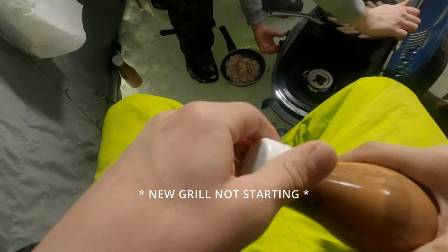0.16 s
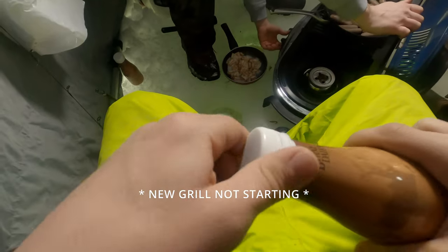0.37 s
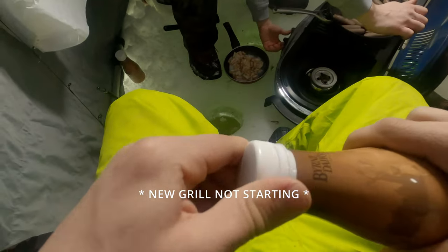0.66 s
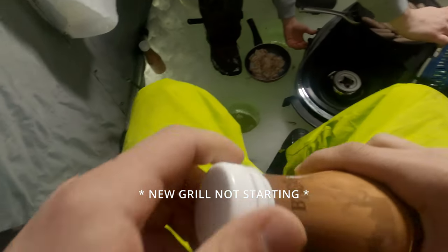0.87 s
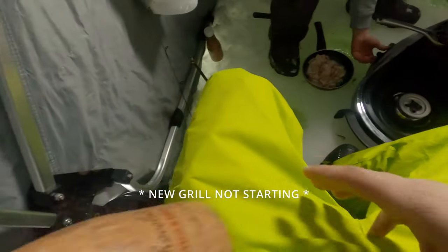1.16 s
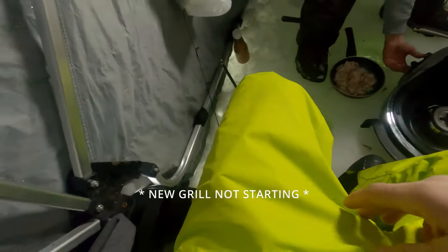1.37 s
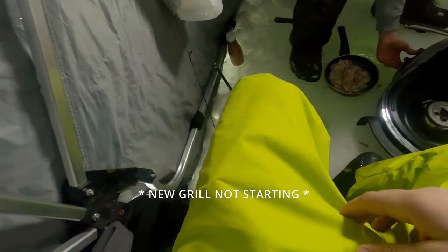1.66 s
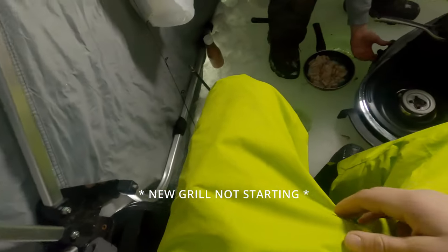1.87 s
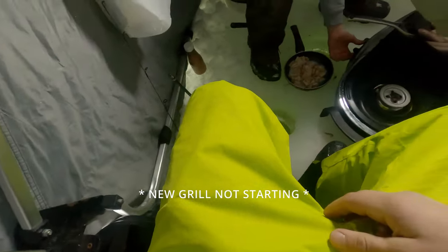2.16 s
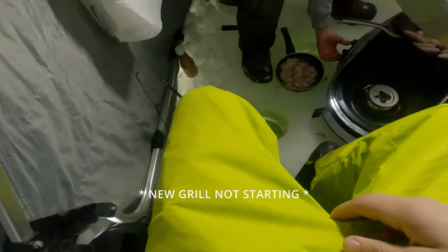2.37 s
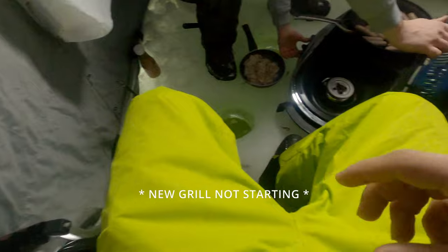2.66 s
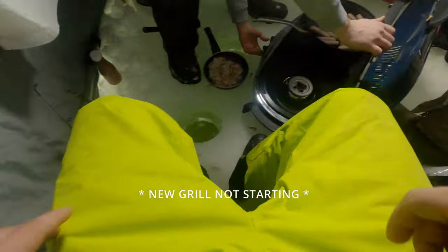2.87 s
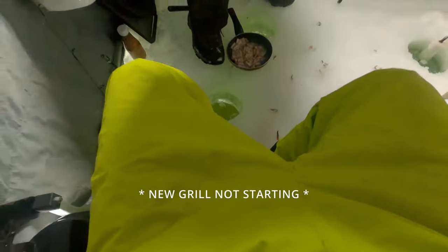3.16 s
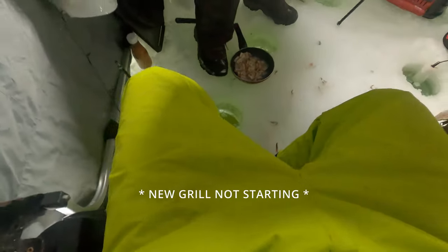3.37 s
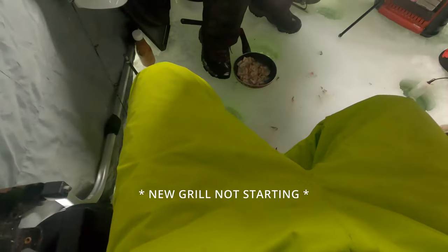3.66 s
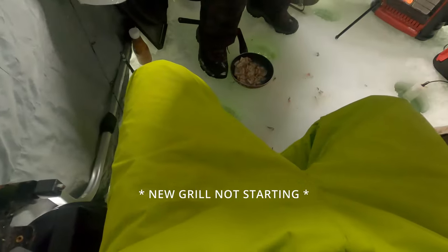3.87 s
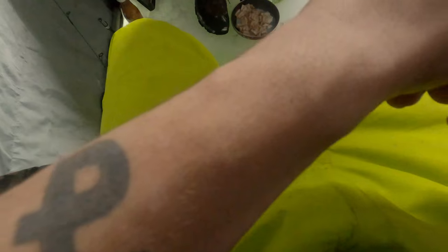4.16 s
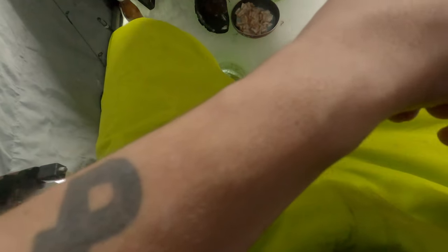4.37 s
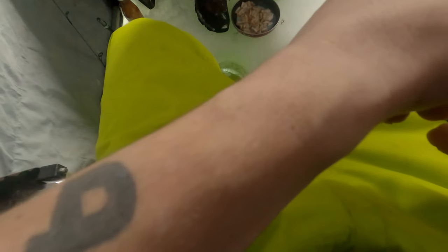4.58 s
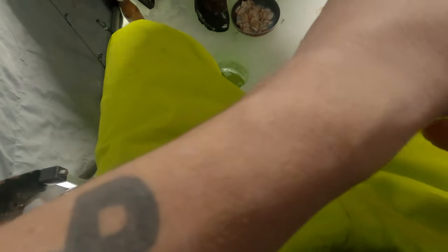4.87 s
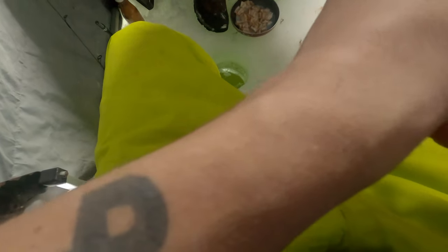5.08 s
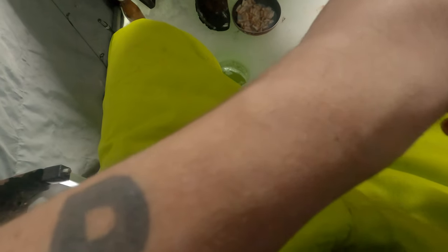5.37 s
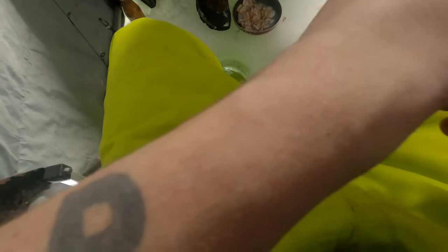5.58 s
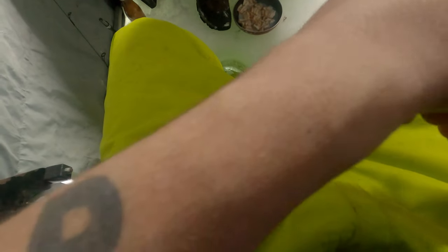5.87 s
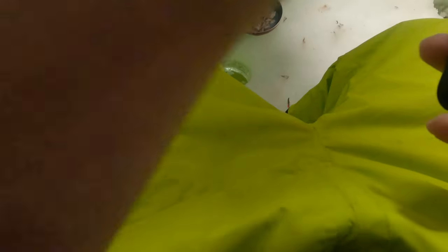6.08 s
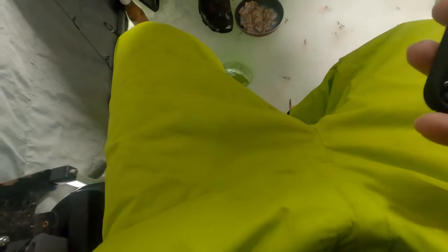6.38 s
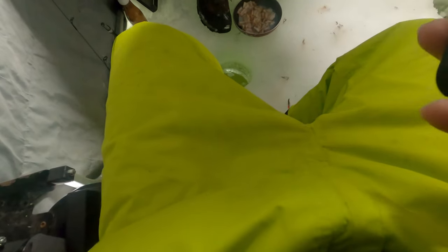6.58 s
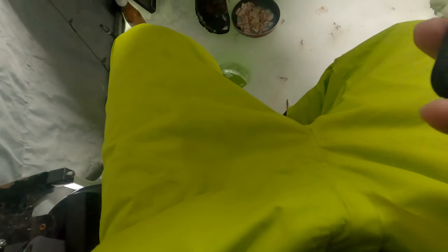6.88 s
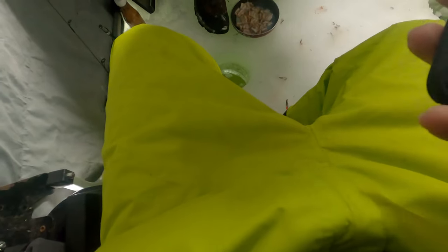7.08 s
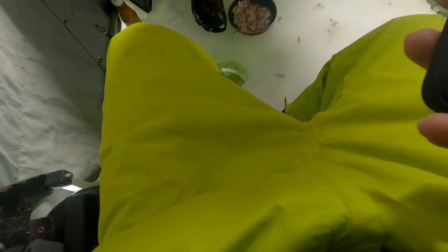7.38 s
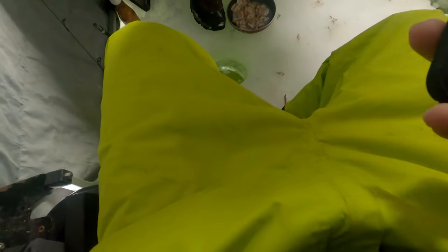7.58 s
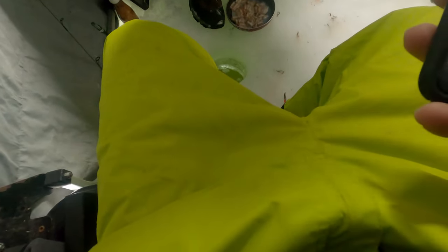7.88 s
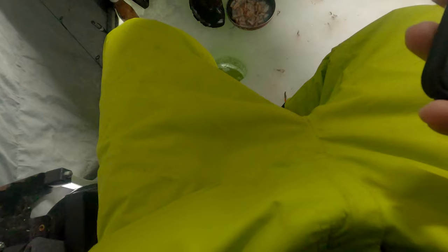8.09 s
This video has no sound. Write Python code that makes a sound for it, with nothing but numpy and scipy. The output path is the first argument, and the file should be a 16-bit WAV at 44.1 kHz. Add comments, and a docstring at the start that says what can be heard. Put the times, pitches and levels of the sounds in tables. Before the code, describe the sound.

Sharp, slightly ringing igniter snaps repeat on a grill that never catches, with soft rattles, thuds and close bottle handling.

```python
"""Gas grill that will not light

A portable grill's piezo igniter is pressed again and again in a small shack; the gas never catches.
Each hammer snap rings the metal, and the button rattles softly between presses. The grill is bumped a few
times. Close by, someone handles a bottle and shifts in stiff trousers, over faint gas hiss and rumble."""
import sys
import numpy as np
from scipy import signal
from scipy.fft import rfft, irfft
from scipy.io import wavfile
from scipy.ndimage import uniform_filter1d

SR = 44100
rng = np.random.default_rng(int(sys.argv[2]) if len(sys.argv) > 2 else 0)


def wav_out(sig):
    """Save sig, one row per channel (or a flat mono array), as 16-bit PCM at SR to the path in sys.argv[1]."""
    wavfile.write(sys.argv[1], SR, np.round(np.clip(np.atleast_2d(sig).T, -1, 1) * 32767).astype(np.int16))


N = 363516
HIT = 2 ** 15  # samples per hit
HIT_TIME_S, TIME_S = np.arange(HIT) / SR, np.arange(N) / SR
SIDES = np.array([[1], [-1]])  # left, right


def undb(db):
    """Decibels to gain."""
    return 10 ** (np.asarray(db) / 20)


def decay(t60_s, time_s=HIT_TIME_S):
    """Envelope falling 60 dB in t60_s."""
    return np.exp(-np.log(1000) * time_s / t60_s)


def contour(points, size=HIT):
    """(freq_hz, value) points joined over log frequency, per FFT bin."""
    hz, value = np.transpose(points)
    return np.interp(np.log(np.fft.rfftfreq(size, 1 / SR) + 1), np.log(hz), value)


def humps(resonances, size=HIT):
    """(centre_hz, half_width_hz, gain_db) rows as bell curves, dB per FFT bin."""
    bin_hz = np.fft.rfftfreq(size, 1 / SR)
    return sum(db * np.exp(-((bin_hz - hz) / width) ** 2) for hz, width, db in resonances)


def causal(gain_db):
    """Minimum-phase response: rings only after it is struck."""
    cepstrum = irfft(np.log(undb(gain_db)))
    cepstrum[1:HIT // 2] *= 2
    cepstrum[HIT // 2 + 1:] = 0
    return np.exp(rfft(cepstrum))


def flatten(spectrum, width_hz):
    """Remove broad colour, keep fine peaks and dips."""
    power = np.mean(np.abs(np.atleast_2d(spectrum)) ** 2, axis=0)
    broad_power = uniform_filter1d(power, int(width_hz * HIT / SR))
    return spectrum * causal(-10 * np.log10(broad_power + 1e-12))


def stereo_noise(size, spread):
    """White noise, its channels most alike in the bass."""
    mid, side = rfft(rng.standard_normal((2, size)))
    share = spread * contour([(300, 0.13), (1200, 0.47), (4000, 1)], size)
    return irfft((mid + SIDES * share * side) / np.sqrt(1 + share ** 2))


def coloured_noise(colour_db, spread):
    """Scene-long stereo noise, rms 1."""
    noise = irfft(rfft(stereo_noise(N, spread)) * undb(colour_db))
    return noise / noise.std()


def flicker(rate_hz, depth_db):
    """Randomly wandering gain."""
    steps = TIME_S * rate_hz
    knots = rng.standard_normal(int(steps[-1]) + 2)
    return undb(depth_db * np.interp(steps, np.arange(len(knots)), knots))


def swell(middle_s, length_s, attack_s, release_s):
    """Envelope of one movement: rise, hold, decay."""
    t = TIME_S - middle_s
    return np.exp(np.minimum(t + length_s / 2, 0) / attack_s - np.maximum(t - length_s / 2, 0) / release_s)


def rub(length_s):
    """Spectrum of many small slips that swell and fade."""
    progress = HIT_TIME_S / length_s
    return rfft(rng.standard_normal(HIT) * progress * np.exp(-2 * progress ** 2))


def add_hit(out, spectrum, start_s, level_db, pan_db=0):
    """Mix in a hit; level_db is its energy spread over 20 ms, pan_db is left minus right."""
    hit, start = irfft(spectrum), int(start_s * SR)
    hit /= np.sqrt(np.sum(hit ** 2) / (2 * 0.02 * SR))
    pan = undb(SIDES * pan_db / 2)
    pan /= np.sqrt(np.mean(pan ** 2))
    out[:, start:start + HIT] += (hit * undb(level_db) * pan)[:, :N - start]


# freq_hz, t60_s
SHACK_DECAY = [(150, 0.22), (400, 0.33), (700, 0.43), (1150, 0.15), (1700, 0.19), (2500, 0.2), (4000, 0.15),
               (6500, 0.13), (12000, 0.11)]


def shack_tail(noise):
    """Reverberation spectrum: noise dying away band by band."""
    hz, t60_s = np.transpose(SHACK_DECAY)
    spectrum, tail = rfft(noise), 0
    for weights, band_t60_s in zip(np.eye(len(hz)), t60_s):
        band = irfft(spectrum * contour(np.c_[hz, weights]))
        envelope = decay(band_t60_s)
        tail += band * envelope / np.linalg.norm(envelope)
    return rfft(tail)


def shack_path(room_noise, moved=0.97, early_db=-5, early_s=0.0073, onset_s=0.0057):
    """Early reflections off floor and shell, then a tail that changes as people move."""
    t = HIT_TIME_S
    early = stereo_noise(HIT, spread=0.55) * t / early_s * np.exp(-2 * (t / early_s) ** 2)
    early = rfft(early / np.linalg.norm(early[0]))
    echoes = (room_noise + moved * stereo_noise(HIT, spread=1)) / np.hypot(1, moved)
    return undb(early_db) * early + shack_tail(echoes * (1 - np.exp(-t / onset_s)))


# freq_hz, gain_db
SHELL_COLOUR = [(100, -20), (220, -1), (450, -8), (800, -13), (1000, -4), (1400, 1.2), (2700, 0.5),
                (4800, -0.3), (6800, -3), (7500, -6.5), (9500, -14.5), (15000, -28)]
# centre_hz, half_width_hz, leaning_forward_db, sitting_back_db, db_per_hardness_db
SHELL_RESONANCES = [(219, 42, 1, -5, -0.26), (363, 63, -14, 4, 0.36), (630, 310, 6.3, -2.5, -0.44),
                    (1125, 110, 2, 4.5, -0.33), (1525, 167, -7, -5.5, 0), (2270, 560, 1, -1.5, 0.41),
                    (3172, 160, 3, 5, 0.21), (3820, 190, 1.5, 2.5, -0.12), (5720, 450, 5.5, 2, 0.2),
                    (6250, 110, -2, 2.5, 0.65), (6575, 213, 4, 8.5, 1)]


def shell_db(start_s, hardness_db=0, depth=1, scatter_db=0, sit_back_s=3.2):
    """Igniter and shell spectrum; peaks depend on listening position and hardness of the blow."""
    hz, width_hz, forward_db, back_db, slope = np.transpose(SHELL_RESONANCES)
    peaks_db = (forward_db if start_s < sit_back_s else back_db) + hardness_db * slope
    if scatter_db:
        peaks_db += scatter_db * rng.standard_normal(len(hz))
    return contour(SHELL_COLOUR) + humps(np.c_[hz, width_hz, depth * peaks_db])


# time_s, pan_db
GRILL_PAN = [(0, -1.5), (2.2, -1), (6.5, 1), (7.2, 3.5)]


def grill_pan_db(start_s):
    """Direction of the grill as the listener turns."""
    return np.interp(start_s, *np.transpose(GRILL_PAN))


# pitch_hz, relative_db, t60_s
GRATE_MODES = [(211, -13, 0.49), (373.7, 8.5, 0.41), (1068, -2, 0.42), (1263, -3, 0.45), (1400, 0, 0.33),
               (1600, -0.5, 0.39), (1663, 17.5, 0.11), (2340, 0, 0.54), (2920, 9, 0.3), (3077, -8.5, 0.95),
               (3170, 14.5, 0.12), (3500, 0, 0.3), (4000, -1.5, 0.36), (4260, 2, 0.33), (4770, -8, 0.4),
               (5260, 8.5, 0.24), (6240, -2, 0.17), (6630, -14, 0.48)]


def grate_ring(gain_db=-18, scatter_db=2):
    """Lightly damped modes of grate and bowl, varying with each blow."""
    hz, db, t60_s = np.transpose(GRATE_MODES)[:, :, None]
    gains = undb(db + scatter_db * rng.standard_normal(db.shape))
    phases = rng.uniform(0, 2 * np.pi, db.shape)
    ring = np.sum(gains * np.sin(2 * np.pi * hz * HIT_TIME_S + phases) * decay(t60_s), axis=0)
    return undb(gain_db) * rfft(ring / np.linalg.norm(ring))


# start_s, level_db, hardness_db, ring_hz, ring_db, clack_hz
HAMMER_SNAPS = [(0.003, -19, -8.5, 1170, 4.5, 3470), (0.5157, -18.5, -6.5, 1180, 7, 3460),
                (0.9424, -17.5, 4.5, 1130, 12.5, 3190), (1.3777, -18, 2.5, 1123, 11.5, 3190),
                (1.7906, -18, -0.5, 1151, 17, 2830), (2.2267, -19, 3, 1290, 4, 3190),
                (2.7505, -18, -1.5, 1150, 14, 3130), (3.2285, -18, 1.5, 1160, 8, 3400),
                (3.751, -18, -8.5, 1180, 5, 3300), (5.486, -18, -2.5, 1547, 16.5, 3810),
                (6.013, -19.5, -1.5, 1120, 8.5, 3790), (6.5158, -19, -1, 1200, 5.5, 3360),
                (6.867, -20, 2, 1680, -3, 3290), (7.202, -19.5, 3.5, 1670, 3, 3850),
                (7.533, -20, 5, 1630, 0, 3810), (7.889, -19.5, 4, 1610, 0.5, 3280),
                (8.23, -19, 4.5, 1670, 5, 3140)]


def hammer_snaps(room_noise, ring_width_hz=152, clack_width_hz=170, clack_db=6.5):
    """The hammer lands and chatters; the bowl rings and the casing clacks."""
    out = np.zeros((2, N))
    for start_s, level_db, hardness_db, ring_hz, ring_db, clack_hz in HAMMER_SNAPS:
        chatter = rub(length_s=0.002)
        blow = 1 + undb(-7) * chatter / np.std(chatter)
        peaks_db = humps([(ring_hz, ring_width_hz, ring_db), (clack_hz, clack_width_hz, clack_db)])
        body = causal(shell_db(start_s, hardness_db, scatter_db=0.78) + peaks_db)
        strike = flatten(blow * shack_path(room_noise), width_hz=455)
        add_hit(out, body * (strike + grate_ring()), start_s, level_db, grill_pan_db(start_s))
    return out


# freq_hz, gain_db
FABRIC_COLOUR = [(60, 9.5), (150, 2.5), (350, 0.5), (750, -5.5), (1200, 1), (2000, -4), (4000, -4.5),
                 (6500, -14.5), (10000, -22), (15000, -35)]
# middle_s, length_s, level_db
LEG_MOVES = [(0.156, 0.57, -51.5), (1.045, .12, -48.5), (1.297, 0.13, -43), (1.792, 1.42, -52),
             (1.999, 0.066, -43), (2.69, 0.23, -50), (3.404, 1.04, -57.5), (4.904, 0.075, -56),
             (6.193, 0.54, -59.5)]


def trouser_rustle(attack_s=0.085, release_s=0.1):
    """Stiff fabric catches and slips with each movement."""
    power = sum((undb(level_db) * swell(middle_s, length_s, attack_s, release_s)) ** 2
                for middle_s, length_s, level_db in LEG_MOVES)
    rustle = coloured_noise(contour(FABRIC_COLOUR, N), spread=1) * np.sqrt(power)
    return rustle * flicker(rate_hz=54, depth_db=3) * flicker(rate_hz=500, depth_db=2.5)


# time_s, level_db
GAS_LEVEL = [(0, -58.5), (4.08, -56.5), (4.17, -62), (4.38, -60), (4.5, -55), (5.12, -52), (5.26, -57),
             (6.4, -57), (7.1, -53), (8.24, -54)]
# freq_hz, gain_db
GAS_COLOUR = [(100, 10), (270, 1.5), (450, 2.5), (650, -1.5), (880, -8.5), (1350, 4), (2400, -2.5),
              (4000, 1), (6000, -5.5), (7200, -9.5), (8800, -12.5), (10000, -21), (15000, -31)]
# centre_hz, half_width_hz, gain_db
BURNER_RESONANCES = [(363.6, 24, 16.1), (510, 51, 11.2), (1702, 6.8, 13), (1923, 17, 13), (3110, 13, 6),
                     (3800, 16, 5.4), (4160, 26, 6.9), (4890, 32, 7.5), (5160, 25, 7.9), (8240, 45, 4.5),
                     (7900, 70, 4)]


def gas_hiss(cavity_t60_s=0.5):
    """Gas hisses in the hollow burner, whose narrow modes crowd towards the treble."""
    cavity = rng.standard_normal(N) * decay(cavity_t60_s, TIME_S)
    ripple_db = 20 * np.log10(np.abs(rfft(cavity / np.linalg.norm(cavity))) + 0.66)
    ripple_db *= contour([(400, 0.11), (2000, 1)], N)
    colour_db = contour(GAS_COLOUR, N) + humps(BURNER_RESONANCES, N) + ripple_db
    gain = undb(np.interp(TIME_S, *np.transpose(GAS_LEVEL)))
    return coloured_noise(colour_db, spread=0.93) * gain * flicker(rate_hz=11, depth_db=1)


# freq_hz, gain_db
LOW_RUMBLE_COLOUR = [(10, -7), (25, -2.5), (45, 0.5), (70, 2), (100, -3.5), (150, -11.5), (250, -21),
                     (600, -34), (2000, -71)]
# middle_s, length_s, level_db, pan_db
MIC_JOLTS = [(0.398, 0.13, -48, -2), (2.047, 0.12, -45.5, 2), (3.087, 0.12, -42, 7), (3.8, 0.22, -50, -1),
             (5.07, 0.17, -46.5, 1.5)]


def rumble(floor_db=-50, attack_s=0.033, release_s=0.078):
    """Low rumble that swells when the body-worn microphone is jolted."""
    power = undb(floor_db) ** 2
    for middle_s, length_s, level_db, pan_db in MIC_JOLTS:
        jolt = undb(level_db + SIDES * pan_db / 2) * swell(middle_s, length_s, attack_s, release_s)
        power = power + jolt ** 2
    noise = coloured_noise(contour(LOW_RUMBLE_COLOUR, N), spread=1.63)
    return noise * np.sqrt(power) * flicker(rate_hz=9.8, depth_db=3.5)


# start_s, level_db, length_s
FINGER_SCRAPES = [(0.161, -37, 0.037), (0.207, -39, 0.029), (1.044, -47.5, 0.042), (1.14, -45, 0.043),
                  (1.204, -36, 0.054), (1.261, -45, 0.043), (1.313, -43.5, 0.028), (2, -52, 0.024),
                  (2.571, -44.5, 0.12), (4.814, -46.5, 0.077), (5.035, -49, 0.052), (5.113, -52.5, 0.017)]
# freq_hz, gain_db
FINGER_COLOUR = [(100, -11.5), (400, 4.5), (800, -5), (1200, -1), (2000, -0.5), (3000, 2.5), (5000, -2),
                 (6500, -10.5), (10000, -20), (15000, -34)]


def finger_scrapes(echo_db=3):
    """Fingers slip unevenly over bottle cap and trousers."""
    out, colour = np.zeros((2, N)), causal(contour(FINGER_COLOUR))
    for start_s, level_db, length_s in FINGER_SCRAPES:
        scrape = colour * rub(length_s)
        room = 1 + undb(echo_db) * shack_tail(stereo_noise(HIT, spread=0.98))
        add_hit(out, scrape * room, start_s, level_db)
    return out


# start_s, level_db
BUTTON_RATTLES = [(.274, -46.5), (0.421, -41.5), (0.752, -48), (0.875, -41), (2.483, -48), (2.994, -46.5),
                  (3.356, -41), (3.475, -42), (3.936, -48.5), (4.002, -43.5), (4.083, -47.5),
                  (4.497, -43.5), (5.743, -43.5), (6.284, -45.5), (6.75, -47), (7.043, -43.5),
                  (7.072, -46.5), (7.104, -42), (7.398, -42), (7.759, -46), (8.088, -43)]


def button_rattles(room_noise, rub_s=0.0099, direct_db=-6):
    """The plastic button slides and springs back: weaker resonances and treble than the hammer."""
    out = np.zeros((2, N))
    tilt_db = contour([(300, 10), (1100, 6.5), (2200, 3.5), (4500, 2), (7000, -6.5), (14000, -14)])
    for start_s, level_db in BUTTON_RATTLES:
        body = causal(shell_db(start_s, depth=0.15) + tilt_db)
        slide = flatten(rub(rub_s) * (undb(direct_db) + shack_path(room_noise)), width_hz=960)
        add_hit(out, body * slide, start_s, level_db, grill_pan_db(start_s) / 2)
    return out


# start_s, level_db, pitch_hz, t60_s, tick_db
BOTTLE_TAPS = [(0.4041, -43.5, 3300, 0.011, -7), (1.057, -43.5, 894, .04, -24),
               (1.068, -38, 760, 0.024, -20), (1.076, -38, 1060, 0.019, -24), (1.086, -41, 685, 0.028, -26),
               (1.097, -49, 550, 0.035, -18), (1.195, -43, 910, .004, 4), (1.254, -39.5, 705, 0.0033, -6),
               (1.527, -42.5, 1130, 0.0058, -26), (1.9606, -26.5, 1330, 0.037, -10),
               (6.326, -44, 1660, 0.026, -8)]
# freq_hz, gain_db
TICK_COLOUR = [(80, -26.5), (230, 12.5), (700, -2.5), (1700, -1), (3000, -10), (7000, -13), (15000, -59.5)]


def bottle_taps(echo_db=-5):
    """Close taps on the bottle and glugs of its drink: a tick and one short ring each."""
    out, tick = np.zeros((2, N)), causal(contour(TICK_COLOUR))
    for start_s, level_db, pitch_hz, t60_s, tick_db in BOTTLE_TAPS:
        ring = rfft(np.sin(2 * np.pi * pitch_hz * HIT_TIME_S) * decay(t60_s))
        contact = ring / np.linalg.norm(ring) + undb(tick_db) * tick / np.linalg.norm(tick)
        room = 1 + undb(echo_db) * shack_tail(stereo_noise(HIT, spread=0.97))
        add_hit(out, contact * room, start_s, level_db)
    return out


# start_s, level_db, push_s, edge_hz
GRILL_BUMPS = [(3.360, -35.5, 0.013, 1540), (4.142, -41, .008, 1060), (4.882, -33.5, 0.021, 593),
               (5.128, -41, 0.014, 284), (5.337, -21, 0.0095, 2100)]
# freq_hz, gain_db
THUD_COLOUR = [(60, -32), (150, -5.5), (250, -4.5), (370, 0.5), (520, -14.5), (850, -20), (1000, -18),
               (1200, -11.5), (1650, -19), (2000, -18), (2600, -26.5), (5000, -20), (14000, -45)]


def grill_bumps(room_noise, direct_db=-1.5):
    """Brief pushes on the grill: dull thuds, rolled off above edge_hz."""
    out = np.zeros((2, N))
    for start_s, level_db, push_s, edge_hz in GRILL_BUMPS:
        rolloff_db = contour([(edge_hz, 0), (2 * edge_hz, -11), (10 * edge_hz, -25)])
        body = causal(contour(THUD_COLOUR) + rolloff_db)
        push = flatten(rub(push_s) * (undb(direct_db) + shack_path(room_noise)), width_hz=370)
        add_hit(out, body * push, start_s, level_db)
    return out


# start_s, pitch_hz, level_db; the last row is the grill's top mode ringing on
LASTING_TONES = [(3.9, 473, -67), (3.9, 519, -76.5), (6.15, 2000, -71.5), (6.7, 4200, -77),
                 (6.7, 4650, -69), (7.2, 6580, -73)]


def lasting_tones(half_width_hz=5, rise_s=0.04):
    """Faint, lasting, wavering tones: gas drives a few narrow burner resonances, and from 7.2 s the grill's top
    mode near 6.6 kHz rings on."""
    out, bin_hz = np.zeros((2, N)), np.fft.rfftfreq(N, 1 / SR)
    for start_s, pitch_hz, level_db in LASTING_TONES:
        peak_db = -20 * np.log10(1 + ((bin_hz - pitch_hz) / half_width_hz) ** 2)
        onset = np.clip((TIME_S - start_s) / rise_s, 0, 1)
        out += undb(level_db) * coloured_noise(peak_db, spread=0.42) * onset
    return out


def from_right(sound):
    """Source to the right: the left channel lags one sample, weaker above 8.5 kHz, stronger below."""
    pan_db = contour([(4500, 2), (6500, 4.5), (9000, -1), (14000, -1.5)], N)
    left, right = irfft(rfft(sound) * undb(SIDES * pan_db / 2))
    return np.array([np.r_[0, left[:-1]], right])


def scene():
    """Grill, close handling and background in one shack."""
    room_noise = stereo_noise(HIT, spread=0.49)  # echo pattern common to all grill hits
    grill = hammer_snaps(room_noise) + button_rattles(room_noise) + grill_bumps(room_noise)
    handling = bottle_taps() + finger_scrapes() + trouser_rustle()
    return from_right(grill) + handling + gas_hiss() + rumble() + lasting_tones()


def record(dry):
    """Steep low-pass at 15.3 kHz."""
    return signal.sosfilt(signal.ellip(8, 0.2, 70, 15300, fs=SR, output="sos"), dry)


dry = scene()
out = record(dry)
wav_out(out)
```